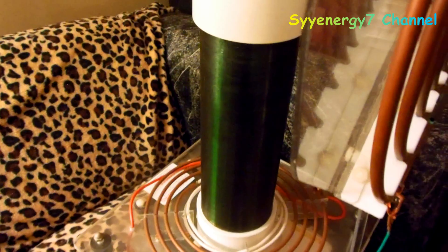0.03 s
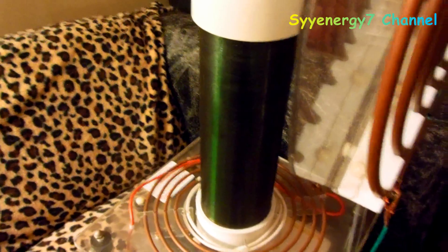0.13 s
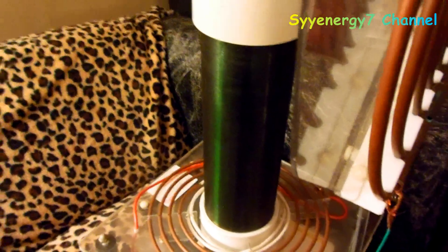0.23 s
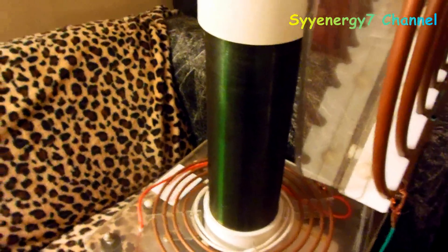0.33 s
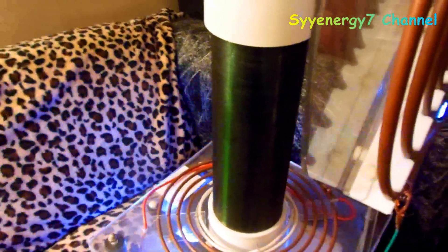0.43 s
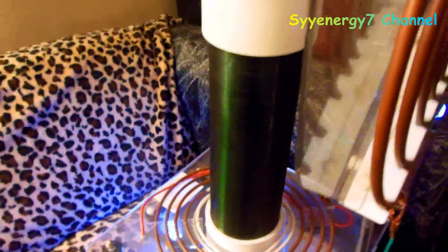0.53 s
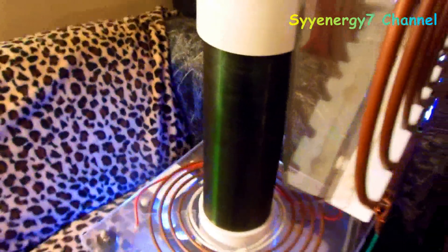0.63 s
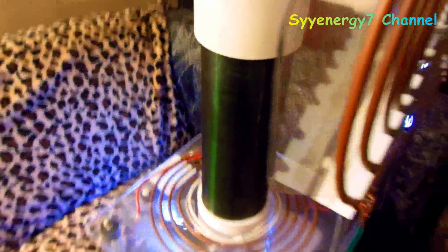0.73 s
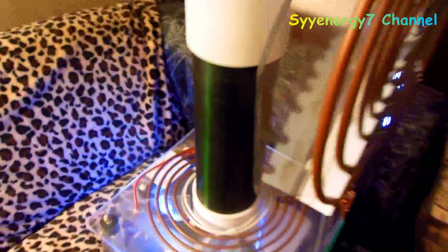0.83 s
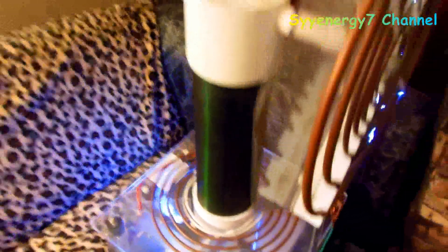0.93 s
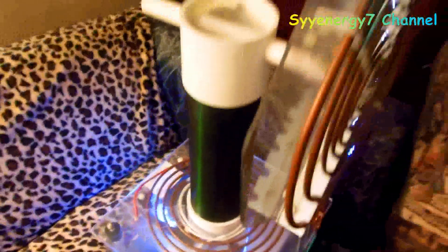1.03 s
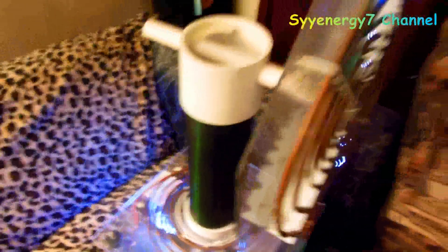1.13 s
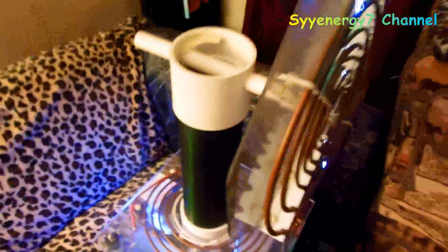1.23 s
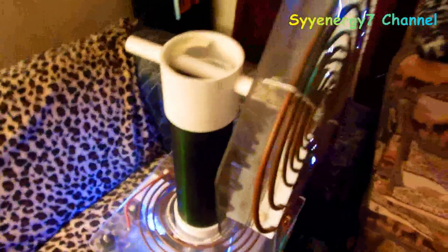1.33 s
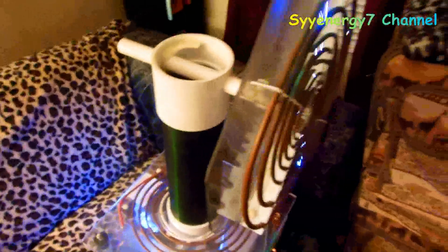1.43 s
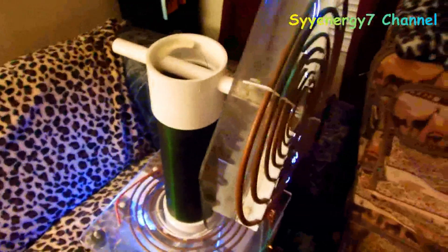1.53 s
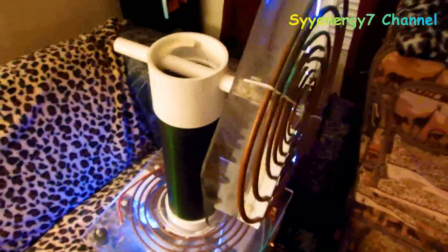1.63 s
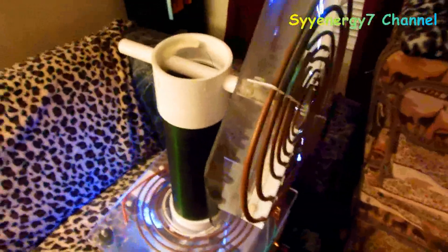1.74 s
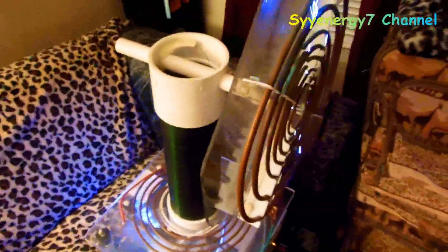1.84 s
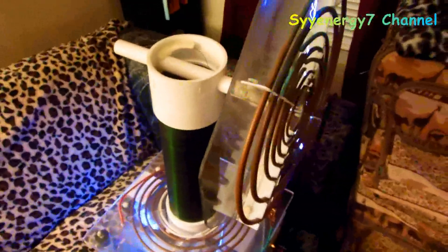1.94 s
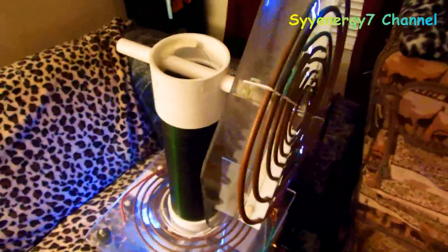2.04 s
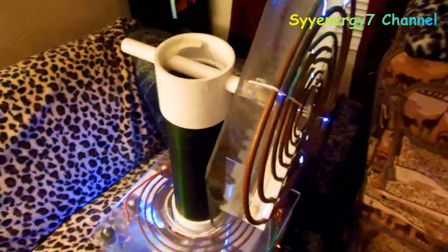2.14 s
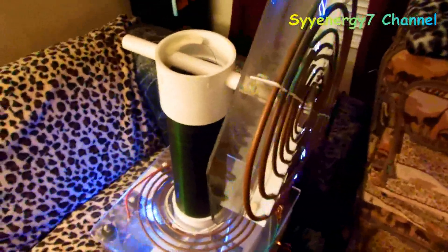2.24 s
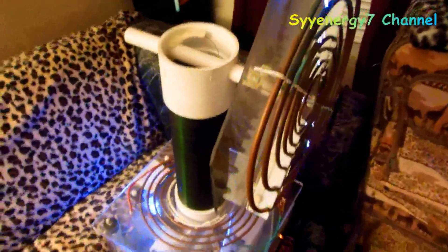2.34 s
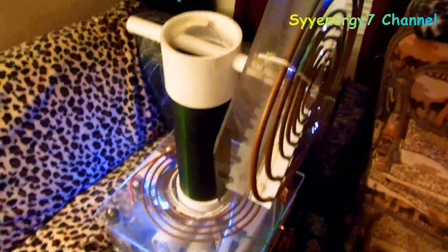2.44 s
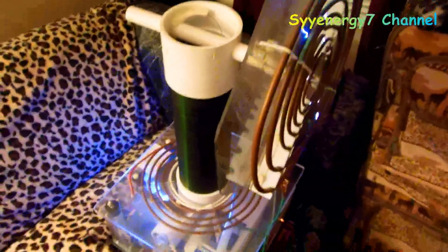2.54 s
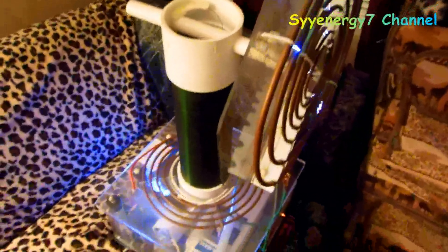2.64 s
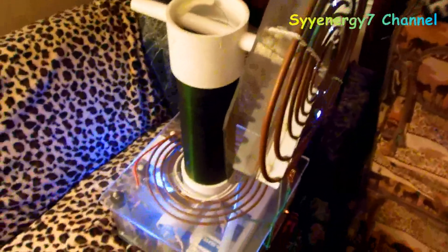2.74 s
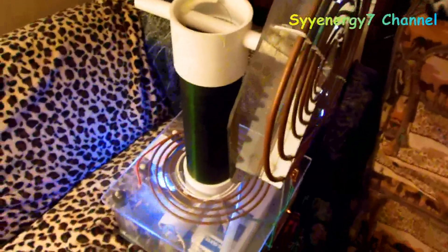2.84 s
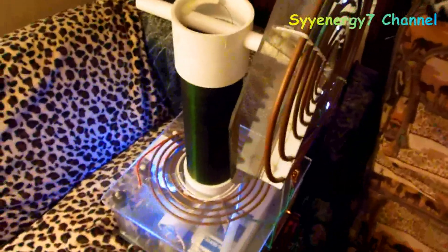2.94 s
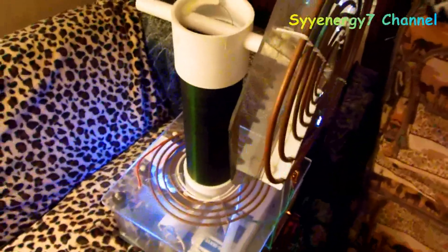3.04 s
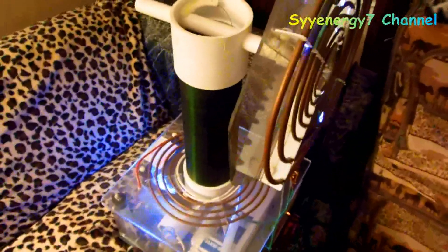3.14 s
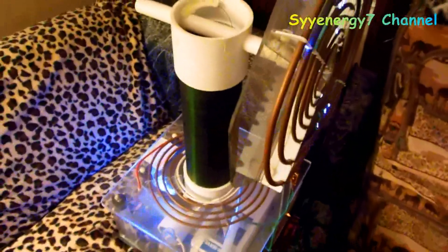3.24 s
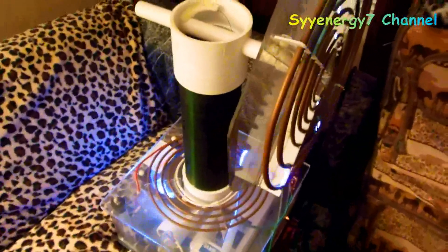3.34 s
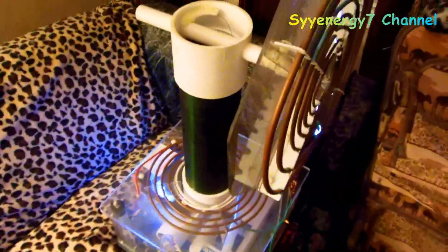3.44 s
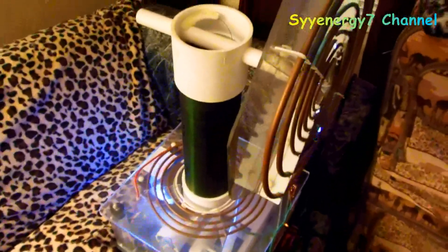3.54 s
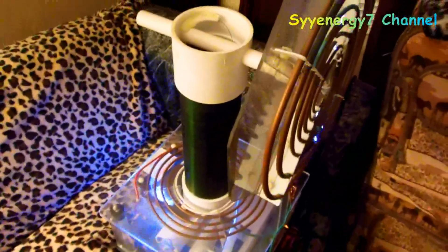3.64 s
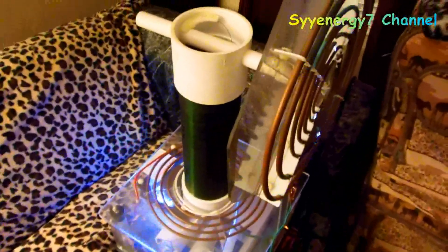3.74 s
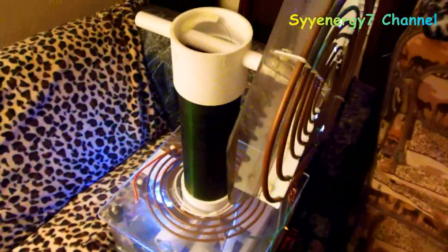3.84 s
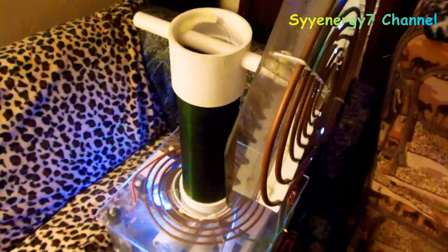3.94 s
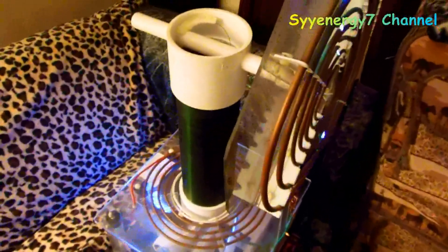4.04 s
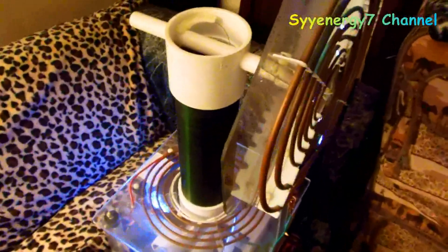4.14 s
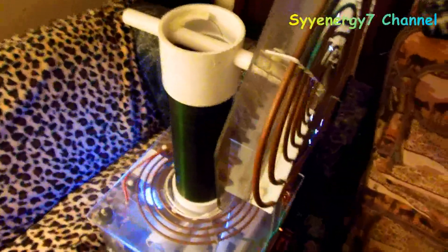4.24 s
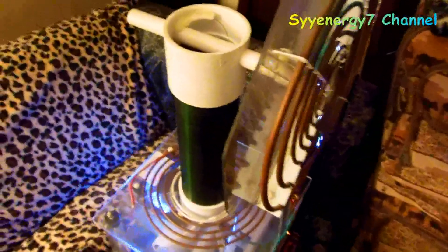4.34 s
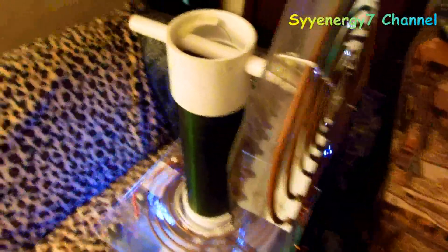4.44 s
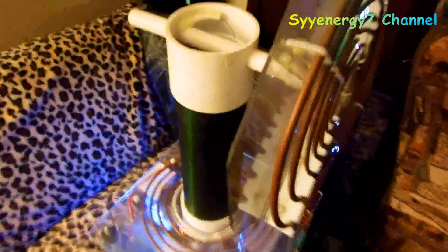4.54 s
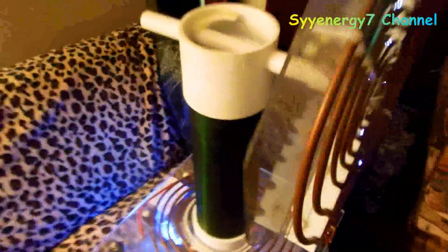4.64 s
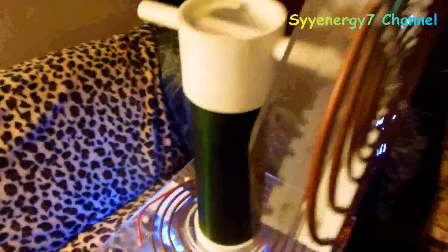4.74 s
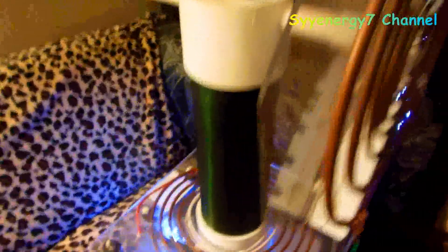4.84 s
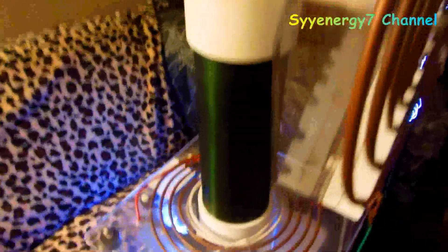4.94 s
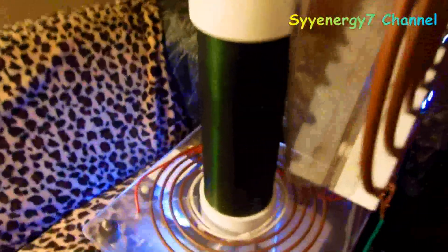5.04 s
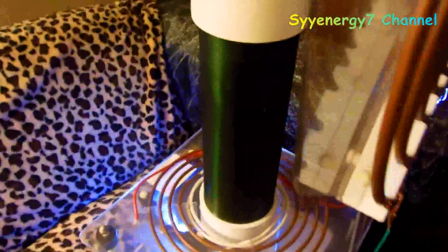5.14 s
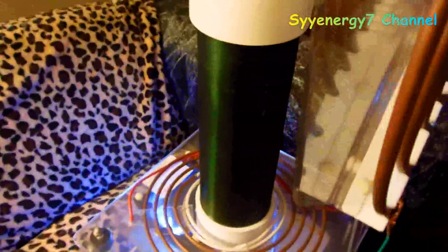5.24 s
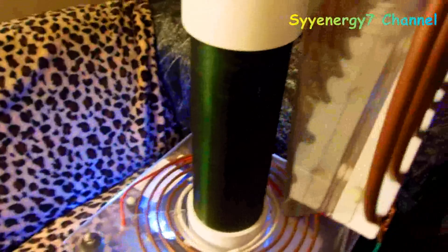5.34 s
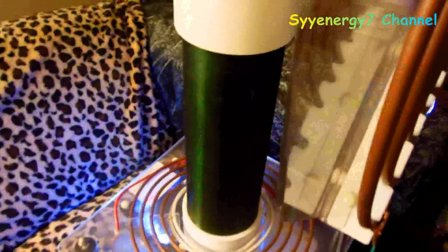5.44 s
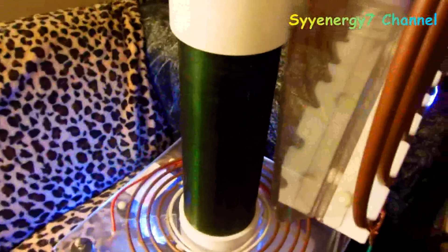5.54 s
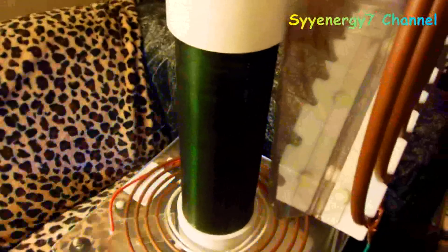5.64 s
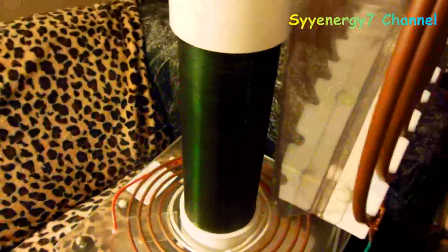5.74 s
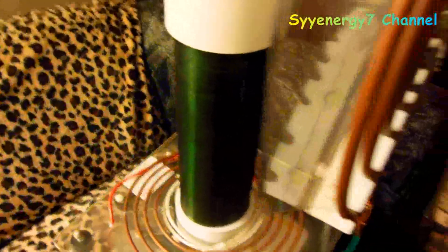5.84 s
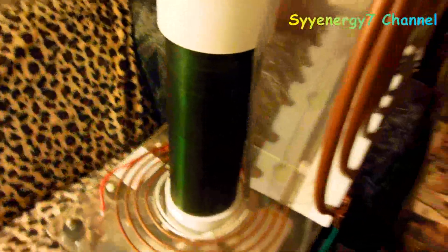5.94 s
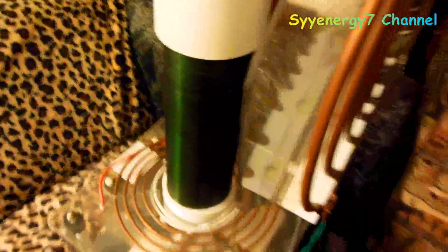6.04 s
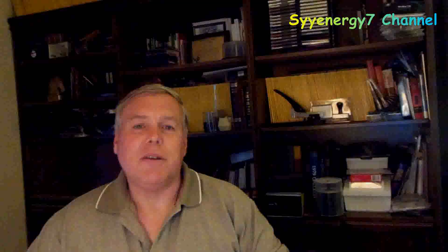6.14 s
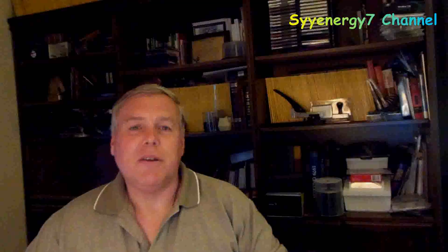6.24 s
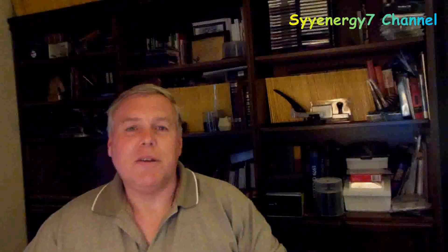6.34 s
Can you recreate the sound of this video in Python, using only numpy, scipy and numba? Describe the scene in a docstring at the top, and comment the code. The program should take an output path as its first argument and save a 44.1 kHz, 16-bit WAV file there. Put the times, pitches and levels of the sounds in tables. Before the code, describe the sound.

A homemade high-voltage coil bursts into a harsh, hissing spark buzz with low thumps, runs about five seconds, then cuts off abruptly.

```python
"""A homemade high-voltage coil runs for five seconds in a small room, near a hand-held microphone.
After a faint hum it starts a hard, hissing buzz: a spinning electrode sparks whenever it passes near
a crest of the mains voltage. The first sparks overload the amplifier until its gain comes down, and
jumps of charge reach its circuit as thumps. The hiss shifts as the hand moves, then the thumps grow
again. The sparks stop at about 5.7 s, leaving a brief faint buzz, a rustle, a click and hiss."""
import sys
import numpy as np
from scipy import signal
from scipy.fft import rfft, irfft
from scipy.io import wavfile
from numba import njit

SR = 44100
rng = np.random.default_rng(int(sys.argv[2]) if len(sys.argv) > 2 else 0)


def generate_wav(signal):
    """Clip the signal to [-1, 1] and save it as 16-bit WAV at the path in sys.argv[1]."""
    frames = np.transpose(np.atleast_2d(signal))
    scaled = np.clip(frames, -1, 1) * 32767
    pcm = np.round(scaled).astype(np.int16)
    wavfile.write(sys.argv[1], SR, pcm)


N = 281710
TIME = np.arange(N) / SR
ON_S, OFF_S = 0.4945, 5.741
MAINS_HZ, CREST_S = 60.02, 0.0037  # the voltage first peaks at CREST_S
QUIET_GAIN_DB = 36.5  # the amplifier's extra gain while nothing is loud
# tone of one spark: f/Hz, relative level/dB
SPARK_TONE = [(100, -6.5), (300, -7.5), (700, -19), (1400, -14.5), (2200, -12), (2900, -6.5), (3500, -3.5),
              (4200, -4), (5200, -3), (5700, -7), (8000, -2.5), (10500, -2.5), (12500, -2.5), (14500, -3),
              (20000, -11.5)]


def coil(times, body_hz=3990, body_db=-21, body_follow=0.45):
    """The whole buzz. Off to the side of the spark gap it loses more treble than body (its low part)."""
    # treble as the microphone moves around the gap: t/s, gain/dB
    treble_gain = [(1.35, -22.5), (1.47, -24.5), (1.71, -22.5), (2.08, -20.5), (2.45, -24), (2.96, -22),
                   (4.12, -23), (4.27, -19.5), (4.75, -23.5), (4.79, -23.5), (5.35, -26.5), (5.7, -24.5)]
    treble_db = curve(treble_gain, TIME)[0]
    buzz = close_microphones(level(sparks(times), -0.4) + level(corona(), -6.5))
    buzz = close_echo(honk_and_dip(cavity(buzz)))
    body = signal.sosfiltfilt(signal.butter(2, body_hz, fs=SR, output="sos"), buzz)
    buzz = (buzz - body) * undb(treble_db) + body * undb(body_db + body_follow * treble_db)
    return buzz * pan(1)


def rotary_gap(passes_hz=414.3, slowing_hz_per_s=1.5, reach=0.56, jitter_s=0.00021):
    """Spark times and voltage signs: the gap fires when an electrode passes near a mains crest."""
    rate_hz = (passes_hz - slowing_hz_per_s * (TIME - ON_S)) * (1 + 0.016 * drift(14))
    passes = np.floor(np.cumsum(rate_hz) / SR)
    times = TIME[1:][np.diff(passes) > 0]
    chance = rng.standard_normal((len(times), 2)).T
    times = times + jitter_s * chance[0]
    phase = 2 * np.pi * MAINS_HZ * (times - CREST_S)
    near_crest = np.abs(np.sin(phase)) < reach + 0.04 * chance[1]
    fires = near_crest & (times > ON_S) & (times < OFF_S)
    return np.append(ON_S, times[fires]), np.append(1, np.sign(np.cos(phase[fires])))


def sparks(times, scatter_db=2.0, sizzle_s=0.00028, stereo_lag_s=0.000018):
    """Each spark snaps and sizzles, echoes off a plate beside the gap and rings the frame and room."""
    # upside-down echo from the plate's edge: t/s, delay/ms, gain/dB
    plate_echo = [(0.9, 0.55, -6), (1.15, 0.56, 4.5), (4.1, 0.56, 4.5), (4.35, 0.51, 4.5), (4.7, 0.54, 5),
                  (5.1, 0.47, -8.5), (5.7, 0.5, -14)]
    # ringing notes of the gap's frame: f/Hz, relative level/dB, time to fade by 60 dB/s
    frame_notes = [(1355, -40.5, 0.04), (1685, -33, 0.02)]
    # the frame is clearest from above: t/s, gain/dB
    frame_gain = [(0.9, -7), (1.5, -2), (4.4, -2), (4.9, -11)]
    # tone of the room's echo: f/Hz, relative level/dB
    wall_tone = [(100, -22.5), (300, -9), (420, -11.5), (700, -11), (1100, -2.5), (2200, -7), (2900, -2),
                 (3500, 0.5), (4500, -5.5), (6000, -3), (8000, -5), (10500, -6.5), (12500, 0.5),
                 (14500, -6.5), (20000, -13)]
    chance = rng.standard_normal((len(times), 4)).T
    # the sparks of one mains crest share its charge
    crest = np.round(2 * MAINS_HZ * (times - CREST_S)).astype(int)
    sizes = np.bincount(crest)[crest] ** -0.19 * undb(scatter_db * chance[0])
    # the unsteady hand shifts the echo, so the hiss swirls
    lag_ms, plate_db = curve(plate_echo, times)
    tremor = np.interp(times, TIME, drift(2.93))
    lag_s = lag_ms / 1000 * (1 + 0.038 * chance[1] + 0.026 * tremor)
    offsets = stereo_lag_s * (np.array([[1], [-1]]) + 1.67 * chance[2:]) / 2
    direct = np.array([impulses(arrival, sizes) - impulses(arrival + lag_s, sizes * undb(plate_db))
                       for arrival in times + offsets])
    clicks = impulses(times, sizes)
    age = TIME[:SR // 4]
    sizzle = ring(clicks, np.exp(-age / sizzle_s)) * rng.standard_normal((2, N))
    snap = colour(level(direct, 0) + level(sizzle, -13), SPARK_TONE)
    chime = sum(undb(db - 60 * age / t60) * np.sin(2 * np.pi * hz * age) for hz, db, t60 in frame_notes)
    frame = ring(level(clicks, 0), chime) * undb(curve(frame_gain, TIME)[0])
    room = level(colour(room_echo(clicks), wall_tone), -5)
    return snap + frame + room


def corona(sharpness=3):
    """Charge leaking into the air: a fine hiss that swells with each mains crest."""
    voltage = np.abs(np.cos(2 * np.pi * MAINS_HZ * (TIME - CREST_S)))
    hiss = rng.standard_normal((2, N)) * voltage ** sharpness * between(ON_S, OFF_S)
    return colour(hiss, SPARK_TONE)


def close_microphones(x, spread_hz=4000, low_side_db=-12):
    """The left and right microphones sit close together, so they differ mainly in the treble."""
    mid, side = (x[0] + x[1]) / 2, (x[0] - x[1]) / 2
    low = signal.sosfiltfilt(signal.butter(4, spread_hz, fs=SR, output="sos"), side)
    side = side - low + low * undb(low_side_db)
    return np.array([mid + side, mid - side])


def cavity(x, flutter_db=1.6, wobble=0.008, flutter_hz=6):
    """The space between coil and plate rings at three high pitches that glide as the hand drifts."""
    # the outer two peaks: t/s, lower f/Hz, its relative level/dB, upper f/Hz, its relative level/dB
    outer_peaks = [(0.8, 8200, -28, 12280, -5.5), (0.98, 8200, -24.5, 11500, -16.5),
                   (1.1, 8200, -20, 10900, -11), (1.3, 7900, -14, 11500, -2), (1.68, 7800, -16, 11600, 0),
                   (1.85, 8500, 1, 12300, -31), (2.0, 8000, -10, 12000, -14), (2.3, 8400, -7, 12190, -10),
                   (2.5, 7870, -3, 11970, -8), (2.75, 8060, -4, 11800, -5), (2.9, 8100, -5.5, 11720, 1.5),
                   (3.05, 8000, -1.5, 11800, -9), (3.4, 8500, -6, 12500, 1), (3.55, 8430, -4, 11900, -6),
                   (3.65, 8050, -10, 11490, 2), (3.75, 8050, -3, 11700, -14), (4.0, 7900, -4, 12000, -30),
                   (4.18, 7700, -14, 11400, -9), (4.35, 9000, -12, 11610, -36), (4.72, 8500, -14, 10900, 3),
                   (4.9, 8300, -21, 10900, -27)]
    lower_hz, lower_db, upper_hz, upper_db = curve(outer_peaks, TIME)
    middle_hz, mean_db = (lower_hz + upper_hz) / 2, (lower_db + upper_db) / 2
    peaks = [(lower_hz, 1000, lower_db), (upper_hz, 850, upper_db), (middle_hz, 600, mean_db - 1)]
    out = x
    for hz, width_hz, db in peaks:
        gain = undb(db - 1 + flutter_db * drift(flutter_hz))
        out = out + gain * band(x, hz * (1 + wobble * drift(flutter_hz)), width_hz)
    valleys = sum(band(out, (middle_hz + hz) / 2, width_hz=450) for hz in (lower_hz, upper_hz))
    return out - undb(-8 + mean_db / 2) * valleys


def honk_and_dip(x, dip_hz=3500, dip_depth=0.52):
    """Close to the coil the buzz honks; a narrow, drifting band just above the honk is weakened."""
    # the honk, heard from low beside the coil: t/s, f/Hz, gain/dB
    honk = [(0.9, 1500, -3), (1.3, 1700, -28), (4.7, 2600, -19), (5.05, 2550, -4)]
    honk_hz, honk_db = curve(honk, TIME)
    x = x + undb(honk_db) * band(x, honk_hz, width_hz=1200)
    return x - dip_depth * band(x, dip_hz * (1 + 0.014 * drift(2.7)), width_hz=300)


def close_echo(x, shake=0.02015, shake_hz=7):
    """Short, unsteady echoes give the first blast a metallic rasp and make the later hiss swirl."""
    # echo from the plate and a sofa: t/s, base delay/ms, base gain/dB
    echo = [(0.5, 2.58, -10), (0.8, 2.48, -6), (1.1, 2.2, -15), (1.3, 2.1, -18.5)]
    # the reflecting surfaces: multiple of the base delay, added gain/dB
    surfaces = [(.36, -9.5), (0.621, -4), (0.999, -3), (1.131, -5), (1.47, -1.5), (1.72, -2.5)]
    lag_ms, db = curve(echo, TIME)
    out, power = x, 1
    for path, surface_db in surfaces:
        delay_s = lag_ms * path * (1 + shake * drift(shake_hz)) / 1000
        gain = undb(db + surface_db)
        out = out + gain * np.array([np.interp(TIME - delay_s, TIME, side) for side in x])
        power = power + gain ** 2
    return out / np.sqrt(power)


def room_echo(source, fade_s=0.11, build_s=0.0017, positions=22):
    """A wash of wall reflections whose pattern changes from one microphone position to the next."""
    age, out = TIME[:SR // 3], np.zeros((2, 2 * N))
    decay = undb(-60 * age / fade_s) * (1 - np.exp(-age / build_s))
    hop = N // positions
    for start in range(0, N - 2 * hop, hop):
        piece = source[start:start + 2 * hop] * signal.windows.cosine(2 * hop)
        echo = signal.fftconvolve(piece[None], rng.standard_normal((2, len(age))) * decay, axes=1)
        out[:, start:start + echo.shape[1]] += echo
    return out[:, :N]


def thumps(times, polarity, swing_hz=8, settle_s=0.031, drain_s=0.006, creep_s=0.00096):
    """Jumps of charge step each microphone's voltage, which creeps on a little and then swings back."""
    # steps from ordinary sparks, largest near the coil: t/s, relative level/dB
    spark_steps = [(.5, -29), (.75, -24.5), (.85, -20.5), (.97, -19.5), (1.04, -32), (1.2, -52), (1.7, -58),
                   (3.9, -53.5), (4.4, -41.5), (4.7, -36), (5.0, -30), (5.25, -36.5), (5.52, -28),
                   (5.74, -27.5)]
    # the largest jumps, heard as single thumps: t/s, relative level/dB, direction (+1 up, -1 down)
    big_jumps = [(0.543, -11, -1), (0.602, -0.5, -1), (0.661, -13, -1), (0.669, -13, -1), (0.679, -9.5, -1),
                 (0.7, -9, -1), (0.72, -12, -1), (0.735, -3, -1), (0.768, -8, -1), (0.785, -6.5, 1),
                 (0.792, -9, -1), (0.803, -1, -1), (0.812, -20, 1), (0.819, -10, -1), (0.829, 0.5, -1),
                 (0.836, -3, 1), (0.844, -3, -1), (0.853, -14, -1), (0.87, -4, -1), (0.876, -4, 1),
                 (0.885, -5, 1), (0.894, -1, -1), (0.902, -4, -1), (0.912, -13, -1), (0.92, 3.5, -1),
                 (0.926, 2, 1), (0.936, -9, 1), (0.943, -6, -1), (0.951, 4, -1), (0.963, 3.5, 1),
                 (0.97, 2.5, -1), (0.977, -13.5, 1), (0.985, 2.5, 1), (0.994, -21, -1), (1.004, -2.5, -1),
                 (1.052, -4.5, -1), (1.07, -21, -1), (1.085, -16, -1), (1.104, -8, -1), (1.119, -11.5, -1),
                 (1.186, -23, -1), (1.201, -23, -1), (1.542, -30.5, -1), (2.084, -26, -1), (2.219, -29, -1),
                 (2.269, -21, -1), (2.352, -22.5, -1), (2.656, -33.5, -1), (3.219, -34, -1),
                 (3.484, -24, -1), (3.585, -34.5, -1), (4.119, -21, -1), (4.269, -29, -1), (4.368, -32, -1),
                 (4.419, -24, -1), (4.502, -28, -1), (4.566, -25, -1), (4.635, -13, -1), (4.668, -18, -1),
                 (4.684, -19.5, -1), (4.701, -17, -1), (4.769, -17, -1), (4.818, -15.5, -1),
                 (4.884, -22, 1), (4.901, -8, -1), (4.951, -17, -1), (4.983, -18.5, -1), (4.994, -30, 1),
                 (5, -22, -1), (5.018, -19, -1), (5.044, -18, -1), (5.084, -20, 1), (5.142, -13, -1),
                 (5.168, -16.5, -1), (5.217, -18, -1), (5.275, -12.5, -1), (5.384, -12, -1),
                 (5.394, -13, 1), (5.434, -18.5, -1), (5.444, -17, -1), (5.451, -27, 1), (5.492, -15, -1),
                 (5.503, -23, 1), (5.51, -15, 1), (5.517, -18, -1), (5.526, -21, 1), (5.551, -10, -1),
                 (5.559, -13.5, -1), (5.567, -20, -1), (5.575, -14, 1), (5.592, -18, 1), (5.6, -9.5, -1),
                 (5.609, -21, 1), (5.617, -17, -1), (5.693, -17.5, 1), (5.699, -20, -1), (5.709, -19, 1),
                 (5.718, -17, -1), (5.725, -18, 1), (5.736, -16, -1)]
    # part of a step that drains quickly, large during the overload: t/s, share (0-1)
    quick_drain = [(.74, 0.5), (.85, 0.33), (0.95, 0.24), (1.15, 0.16), (4.6, 0)]
    chance = rng.standard_normal((len(times), 4)).T
    small = undb(curve(spark_steps, times)[0] + 5 * np.minimum(chance[0], 1))
    small = small * np.sign(chance[1] - 0.75 * polarity)  # the mains sways the direction
    small = small * (1 + chance[2:]) * pan(6.5)
    jump_times, size_db, direction = np.transpose(big_jumps)
    lean_db = 2 * rng.choice([-1, 1], len(jump_times)) * np.array([[1], [-1]])  # left or right
    large = direction * undb(size_db + lean_db) * pan(2)
    steps = np.array([impulses(times, a) + impulses(jump_times, b) for a, b in zip(small, large)])
    age = TIME[:SR // 2]
    rise = 1 - 0.19 * np.exp(-age / creep_s)
    quick = curve(quick_drain, TIME)[0]
    swing = rise * np.exp(-age / settle_s) * np.cos(2 * np.pi * swing_hz * age)
    drain = rise * np.exp(-(age / drain_s) ** 2)
    voltage = ring(steps * (1 - quick), swing) + ring(steps * quick, drain)
    return np.tanh(butter(voltage, [1.36, 2300], "band", order=1))


def amplifier(sound, ceiling=0.68, skew=0.63):
    """The microphone amplifier squashes the wave lopsidedly while its gain is still too high."""
    peak = np.abs(sound).max(axis=0)
    gain_db = gain_control(peak, threshold=undb(-30), fall_db_per_s=42, rise_db_per_s=260, hold_s=0.022)
    drive = sound * undb(gain_db) / ceiling
    # overload pushes the wave off centre, which turns the hiss into a low roar
    shift = skew * butter(np.maximum(np.abs(drive) - 1, 0), 2000, "low", order=1)
    return butter(ceiling * np.tanh(drive - shift), 40, "high", order=1)


@njit
def gain_control(peak, threshold, fall_db_per_s, rise_db_per_s, hold_s):
    """Gain in dB: it falls while recent peaks are over the threshold and climbs back in quiet."""
    out, held, db = np.empty(len(peak)), 0., QUIET_GAIN_DB
    for i in range(len(peak)):
        held = max(peak[i], held * (1 - 1 / (hold_s * SR)))
        db += (-fall_db_per_s if held > threshold else rise_db_per_s) / SR
        db = min(max(db, 0.), QUIET_GAIN_DB)
        out[i] = db
    return out


def dying_buzz(start_s=5.85, rate_hz=94, attack_s=0.032, fade_s=0.2, leak_hz=40):
    """Just after the stop, a faint electrical buzz of evenly spaced steps swells and dies away."""
    age = np.arange(14) / rate_hz
    sizes = undb(-30 - 60 * age / fade_s) * (1 - np.exp(-(age + 0.5 / rate_hz) / attack_s))
    step = np.exp(-2 * np.pi * leak_hz * TIME[:SR // 8])
    return ring(impulses(start_s + age, sizes), step)


def rustle(start_s=5.92, full_s=6.01, end_s=6.18):
    """A soft rustle swells once the sparks have stopped."""
    noise = level(butter(rng.standard_normal((2, N)), [1200, 5000], "band", order=4), -64)
    return noise * np.interp(TIME, [start_s, full_s], [0, 1]) * between(start_s, end_s)


def mains_hum():
    """A hum at twice the mains frequency, weaker once the coil has started."""
    hum = level(np.sin(2 * np.pi * 2 * MAINS_HZ * TIME), 0)
    return hum * (undb(-54) * between(0.053, ON_S) + undb(-63) * between(ON_S, 5.8))


def hand_rumble():
    """The hand holding the microphone makes a low rumble, strongest after the stop."""
    rumble = level(butter(rng.standard_normal(N), 40, "low", order=3), 0)
    return rumble * undb(np.interp(TIME, [OFF_S - 1, OFF_S], [-59, -48]))


def faint_clicks():
    """Small ticks before and after the run, each a quickly fading burst of noise."""
    # the ticks: t/s, level/dB, f/Hz, time to fade by 60 dB/s
    ticks = [(0.061, -47, 3580, 0.11), (0.408, -42, 600, 0.035), (0.409, -54, 2800, 0.04),
             (6.214, -37.5, 790, 0.017)]
    out = np.zeros(N)
    for start_s, db, hz, fade_s in ticks:
        noise = level(butter(rng.standard_normal(N), [hz / 2, hz * 1.22], "band"), db)
        out += noise * (TIME >= start_s) * undb(-60 * np.abs(TIME - start_s) / fade_s)
    return out


def background(whine_hz=431):
    """Room noise, joined late by a faint whine. It dulls after the stop, then gives way to a hiss."""
    # tone of the quiet room: f/Hz, relative level/dB
    room_tone = [(20, 0.5), (60, -12.5), (150, -14.5), (400, -22.5), (1000, -26.5), (3000, -34),
                 (6000, -37.5), (14000, -38.5)]
    # tone of the brighter closing hiss: f/Hz, relative level/dB
    hiss_tone = [(35, -32), (60, -3.5), (231, -9.5), (340, -16), (827, -17.5), (1500, -22.5), (1720, -21.5),
                 (14000, -26.5)]
    whine = level(np.sin(2 * np.pi * whine_hz * TIME), -68) * between(3.8, 6.18)
    room = steady_noise(room_tone, -47.5) * between(0.075, OFF_S)
    dull_room = butter(steady_noise(room_tone, -52), 5500, "low") * between(OFF_S, 6.21)
    hiss = steady_noise(hiss_tone, -45.5) * between(6.212, 7)
    return (room + whine + dull_room + hiss) * undb(-QUIET_GAIN_DB)  # the amplifier lifts it in quiet


def steady_noise(tone, db, width=0.66):
    """Stereo noise of a given tone and level."""
    mid, side = rng.standard_normal((2, N))
    return level(colour([mid + width * side, mid - width * side], tone), db)


def undb(db):
    """Turn decibels into a gain."""
    return 10 ** (np.asarray(db) / 20)


def level(x, db):
    """Scale to an average (rms) level."""
    return x * undb(db) / np.sqrt(np.mean(x ** 2))


def pan(db):
    """Two gains that make the left louder than the right by db."""
    return undb(np.array([[db], [-db]]) / 2)


def curve(rows, at):
    """Read a table's columns at the given times, sliding between rows."""
    times, *columns = np.transpose(rows)
    return [np.interp(at, times, column) for column in columns]


def between(start, end):
    """One from start to end, else zero."""
    return (TIME >= start) * (TIME < end)


def drift(hz):
    """Slow random wandering, typically of size one."""
    return level(butter(rng.standard_normal(N), hz, "low"), 0)


def impulses(times, sizes, reach=6):
    """Clean clicks that can fall between samples."""
    place = times[:, None] * SR
    index = place.astype(int) + np.arange(1 - reach, reach + 1)
    taps = np.sinc(index - place) * np.sinc((index - place) / reach)
    return np.bincount(index.ravel(), (sizes[:, None] * taps).ravel(), N)[:N]


def ring(x, response):
    """Let every sample set off a copy of the response."""
    return signal.fftconvolve(np.atleast_2d(x), np.atleast_2d(response), axes=1)[:, :N]


def colour(x, tone, size=1024):
    """Give a sound the tone of a table (f/Hz, relative level/dB)."""
    hz, db = np.transpose(tone)
    shape = np.interp(np.log(np.fft.rfftfreq(size, 1 / SR) + 1), np.log(hz), db)
    # build the filter so that it rings only after a click, never before
    cepstrum = irfft(np.log(undb(shape)))[:size // 2]
    cepstrum[1:] *= 2
    response = irfft(np.exp(rfft(cepstrum, size)))
    return ring(x, response / np.linalg.norm(response))


def butter(x, hz, kind, order=2):
    """Keep the lows, the highs or a band."""
    return signal.sosfilt(signal.butter(order, hz, kind, fs=SR, output="sos"), x)


def band(x, hz, width_hz):
    """One resonance on both channels; its centre may move."""
    return np.array([resonate(side, hz + np.zeros(N), float(width_hz)) for side in x])


@njit
def resonate(x, hz, width_hz):
    """Keep a band around a moving centre, with gain 1 at the centre."""
    out, band_state, low_state = np.empty(len(x)), 0., 0.
    for i in range(len(x)):
        tuning, damping = np.tan(np.pi * hz[i] / SR), width_hz / hz[i]
        swing = (band_state + tuning * (x[i] - low_state)) / (1 + tuning * (tuning + damping))
        band_state = 2 * swing - band_state
        low_state += 2 * tuning * swing
        out[i] = damping * swing
    return out


def scene():
    """The coil and room through the amplifier, plus electrical thumps and small noises."""
    times, polarity = rotary_gap()
    loud = amplifier(coil(times) + background()) + thumps(times, polarity)
    return loud + dying_buzz() + rustle() + mains_hum() + hand_rumble() + faint_clicks()


def record(dry, top_hz=14250):
    """Flatten peaks beyond full scale and cut the highest treble."""
    return signal.sosfilt(signal.ellip(12, .2, 70, top_hz, fs=SR, output="sos"), np.clip(dry, -1, 1))


dry = scene()
out = record(dry)
generate_wav(out)
```